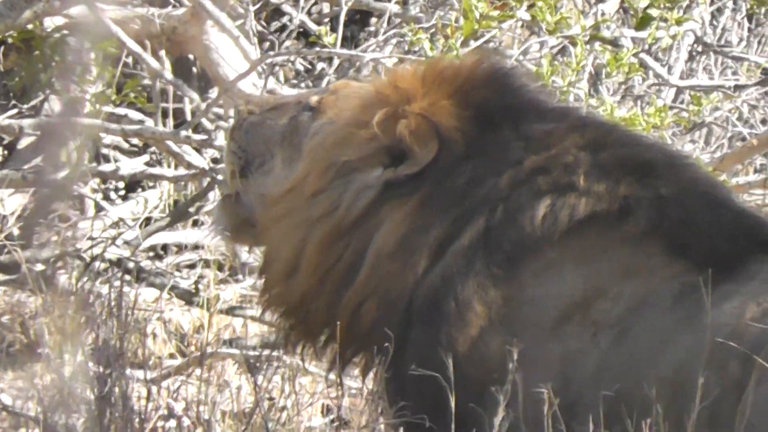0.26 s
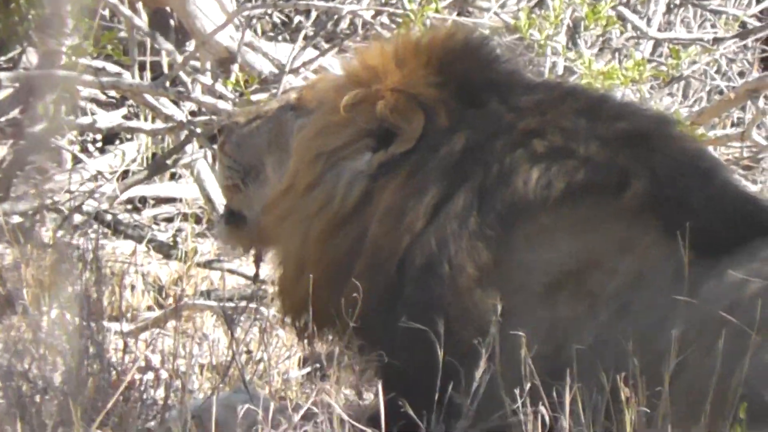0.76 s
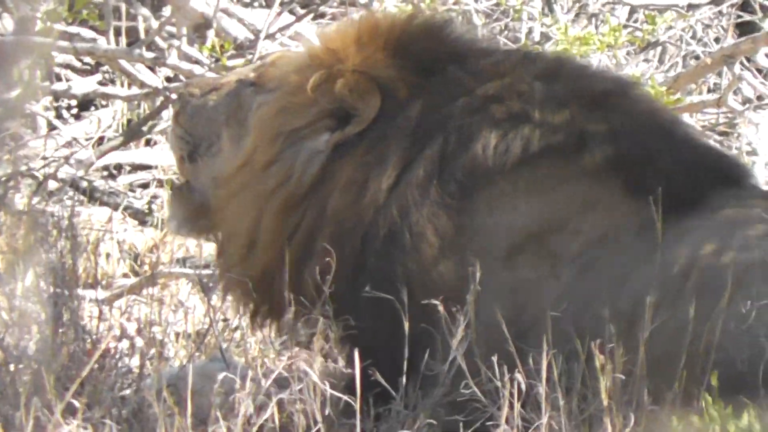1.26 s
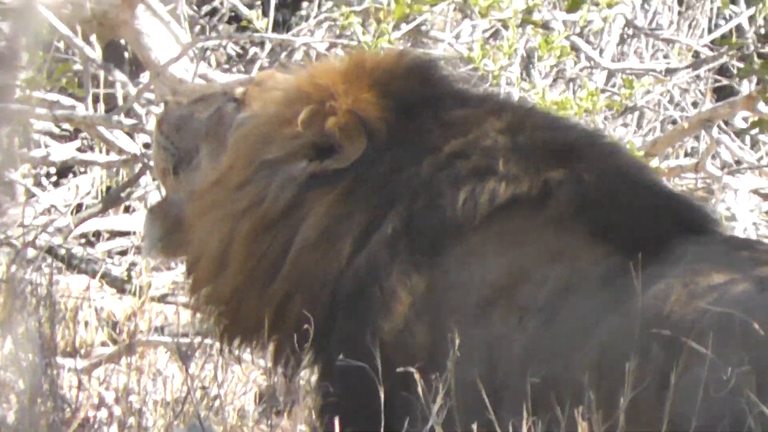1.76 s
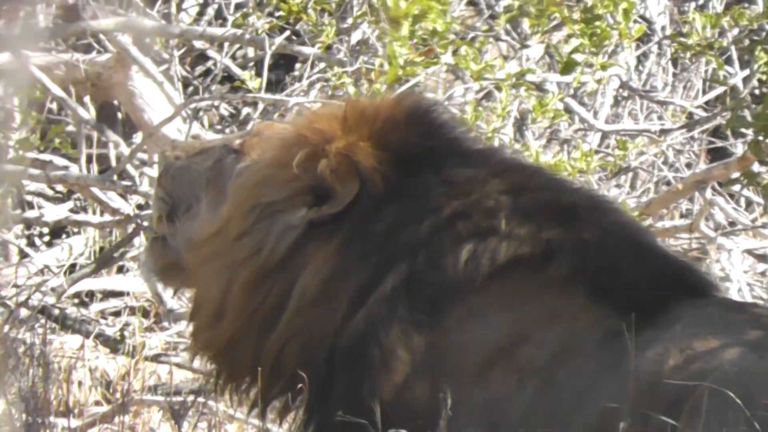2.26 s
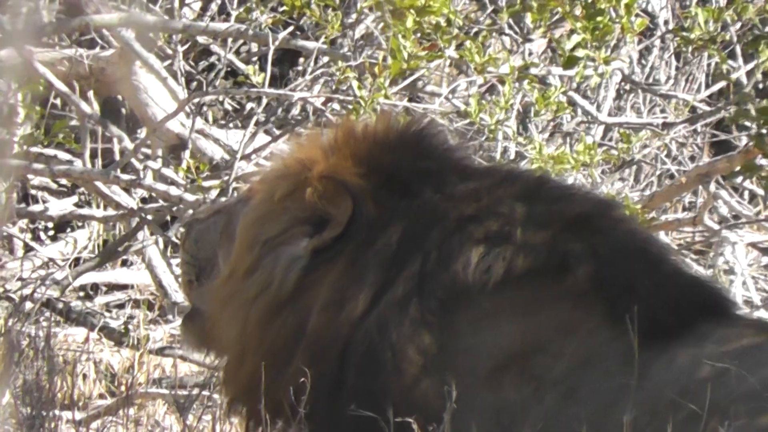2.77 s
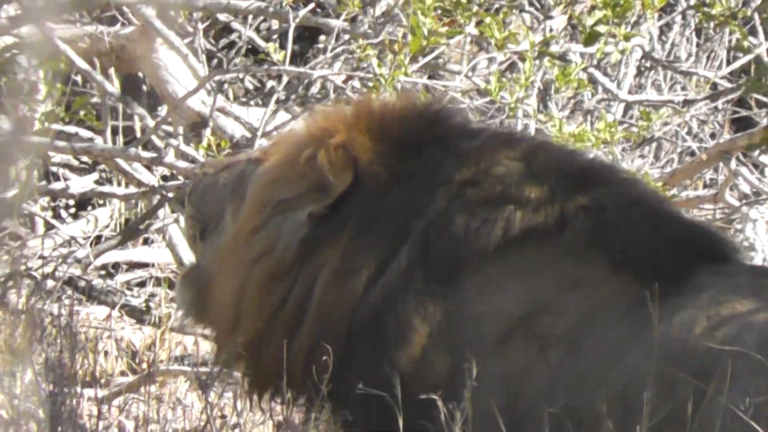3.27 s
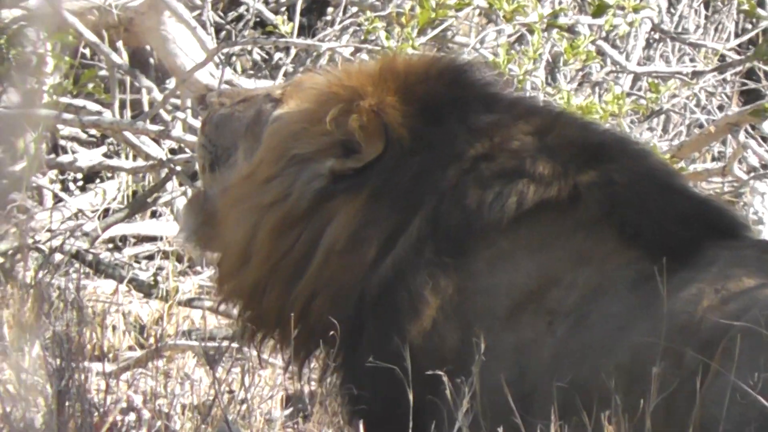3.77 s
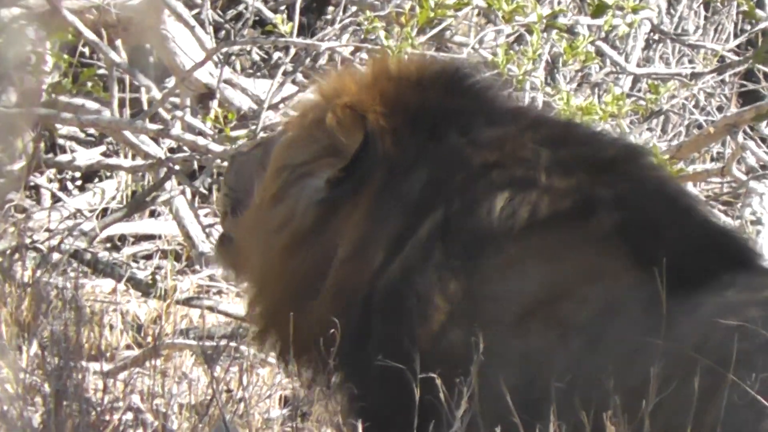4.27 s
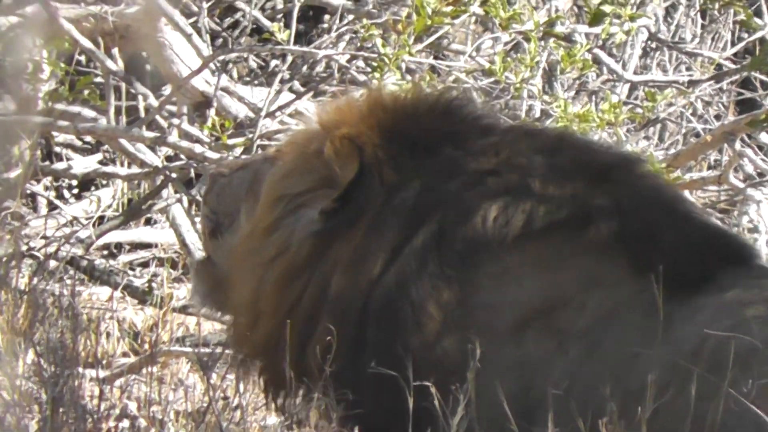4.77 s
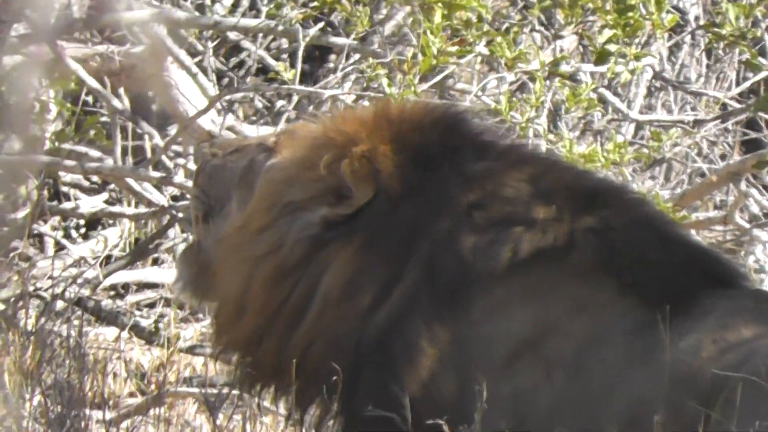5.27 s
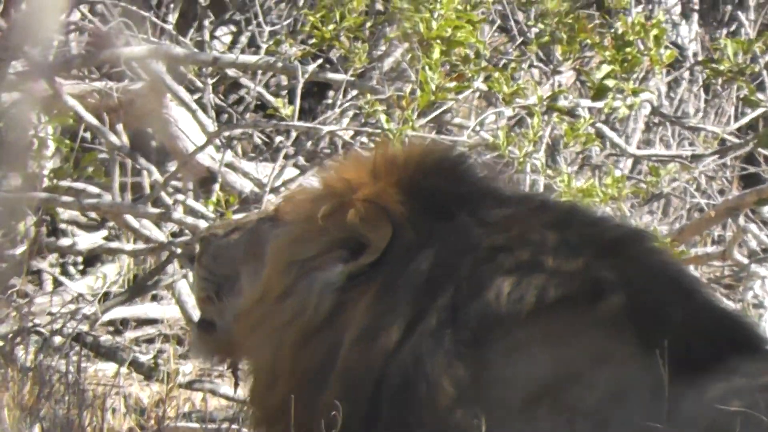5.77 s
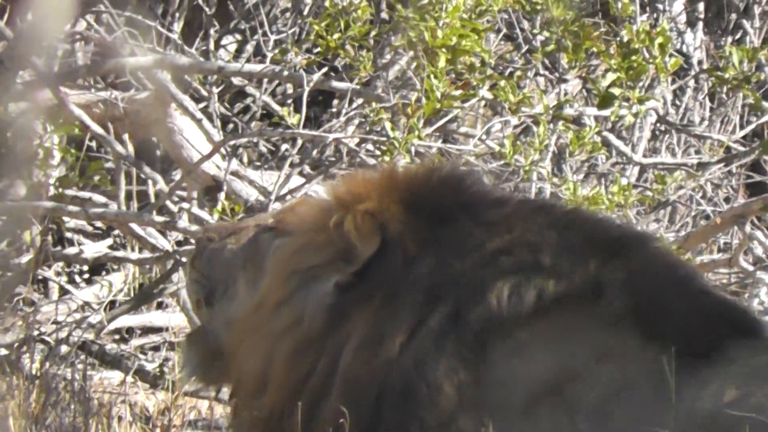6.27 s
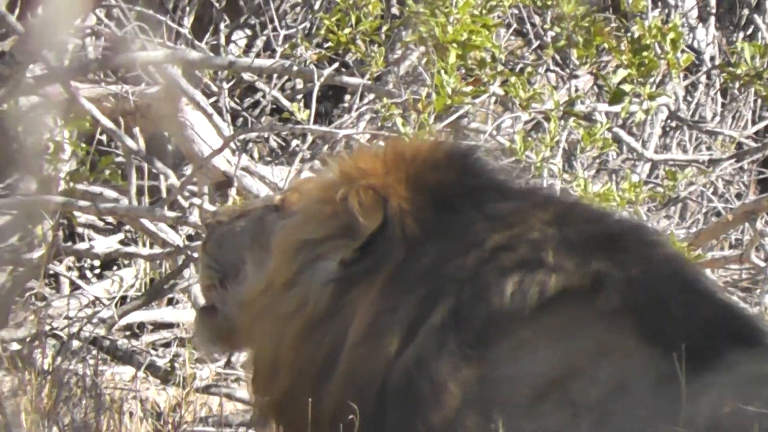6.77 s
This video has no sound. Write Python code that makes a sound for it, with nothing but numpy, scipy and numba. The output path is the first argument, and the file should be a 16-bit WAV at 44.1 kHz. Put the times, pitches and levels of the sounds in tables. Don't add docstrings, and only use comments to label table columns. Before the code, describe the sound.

Outdoors in dry bush, a male lion some way off calls five times, the first already under way. Most calls rise as a hoarse, breathy moan, open into a pure low boom that falls in pitch, then rattle out. Faint thicket echoes follow. Twigs tick early on, and a fly hums near the hand-held stereo microphone during the later calls.

```python
import sys
import numpy as np
from scipy import signal
from scipy.fft import rfft, irfft
from scipy.io import wavfile
from scipy.ndimage import uniform_filter1d
from numba import njit

SR = 44100
rng = np.random.default_rng(int(sys.argv[2]) if len(sys.argv) > 2 else 0)


def put_to_file(sound):
    columns = np.atleast_2d(sound).T
    safe = np.clip(columns, -1, 1)
    whole_steps = np.round(safe * 32767)
    wavfile.write(sys.argv[1], SR, whole_steps.astype(np.int16))


def magnitude_from_level(level_db):
    exponent = np.asarray(level_db, float) / 20
    return 10 ** exponent


N = 310023


def level(x, db):
    return x * magnitude_from_level(db) / np.sqrt(np.mean(x ** 2))


def steady(x, span_s):
    return x / np.sqrt(uniform_filter1d(x ** 2, int(span_s * SR)) + 1e-12)


def walk(rate):
    hold = int(SR / rate)
    steps = np.repeat(rng.standard_normal(N // hold + 1), hold)
    return 1.3 * uniform_filter1d(uniform_filter1d(steps, hold), hold)[:N]


def on_hz(table, hz):
    at, value = np.transpose(table)
    return np.interp(np.log(hz), np.log(at), value)


def columns(calls):
    t = np.arange(N) / SR
    s, *values = np.transpose(np.vstack(calls))
    gate = sum((t >= call[0][0]) & (t <= call[-1][0]) for call in calls)
    return uniform_filter1d(1. * gate, size=900), [np.interp(t, s, v) for v in values]


@njit
def svf(x, hz, width):
    y, b, l = np.empty(len(x)), 0., 0.
    for i in range(len(x)):
        g, k = np.tan(np.pi * hz[i] / SR), width / hz[i]
        v = (b + g * (x[i] - l)) / (1 + g * (g + k))
        b, l, y[i] = 2 * v - b, l + 2 * g * v, k * v
    return y


def ring(x, hz, width):
    hz = hz * np.ones(len(x))
    return svf(svf(x, hz, 1. * width), hz, 1. * width)


def resonate(x, modes, stretch=1):
    out = 0
    for k, (hz, width, db) in enumerate(modes):
        out = out + (-1) ** k * magnitude_from_level(db) * ring(x, hz * stretch, 1.8 * width)
    return out


def place(x, pan, lead):
    hz = np.maximum(np.arange(N // 2 + 1) * SR / N, 1)
    turn = magnitude_from_level(on_hz(pan, hz) / 2) * np.exp(1j * on_hz(lead, hz) / 2)
    return np.array([irfft(rfft(x) * turn, N), irfft(rfft(x) / turn, N)])


# (pitch_hz, level_db per Hz)
BUSH = [(15, -67), (25, -34.5), (43, -16.5), (91, -12.5), (156, 0), (247, -6), (324, -10.5), (435, -10),
        (727, -15.5), (951, -18.5), (1030, -24), (1150, -20.5), (1820, -27), (4930, -34), (15700, -44.5)]
# (pitch_hz, likeness 0-1)
BUSH_ALIKE = [(60, .3), (130, 1), (290, 0.18), (640, .2), (1400, 0.64), (2100, 0.71), (2800, 0.29),
              (4500, 1), (8000, 1), (12000, 0.26)]


def bush():
    out, swell = 0, walk(0.95)
    for hz in 28 * 2 ** np.arange(0, 9.2, 1 / 3):
        alike = np.clip(on_hz(BUSH_ALIKE, hz), 0, .98)
        mid, side = (ring(rng.standard_normal(N), hz, hz / 3) for _ in range(2))
        db = on_hz(BUSH, hz) + 1.0 * swell + 1.0 * walk(8.1)
        left_right = np.sqrt(1 - alike) * side * np.array([[1], [-1]])
        out = out + magnitude_from_level(db) * (np.sqrt(1 + alike) * mid + left_right)
    return level(out, -51.5)


# (pitch_hz, level_db)
CAMERA = [(974, -71), (1260, -76), (2525, -85), (15000, -100)]


def camera():
    t = np.arange(N) / SR
    motor = sum(magnitude_from_level(db + 3.0 + 1.3 * walk(18)) * np.sin(2 * np.pi * hz * t) for hz, db in CAMERA)
    hiss = level(ring(rng.standard_normal(N), 4047, 250), -80)
    drone = level(ring(rng.standard_normal(N), 60, 24), -72.0)
    return motor + hiss + drone


# (start_s, peak_db, pitch_hz)
TWIGS = [(0.573, -48, 6400), (0.7956, -55, 5280), (1.0618, -53.5, 4360), (1.18, -56.5, 4620),
         (1.2794, -52, 4990)]


def twigs():
    out, t = np.zeros(N), np.arange(600) / SR
    for s, db, hz in TWIGS:
        snap = ring(rng.standard_normal(len(t)) * np.exp(-t / 0.0018), hz, 0.77 * hz)
        out[int(s * SR):int(s * SR) + len(t)] += magnitude_from_level(db) * snap / np.abs(snap).max()
    return out


# (time_s, wing_rate_hz, second_partial_db, wing_tick_db)
FLY = [
    [(4.46, 248.3, -78, -88), (4.486, 249.2, -64, -82), (4.516, 288.3, -61, -82), (4.6, 260.1, -59, -80),
     (4.658, 280.0, -51, -78), (4.702, 249.0, -56.5, -78.5), (4.9, 262.6, -54, -69),
     (5.038, 252.9, -60, -70), (5.08, 235.4, -67.5, -77)],
    [(5.69, 252.9, -63, -77), (5.726, 279.2, -55.5, -74), (5.918, 257.0, -50.5, -73.5),
     (5.98, 278.5, -56, -74), (6.074, 249.3, -54, -73.5), (6.156, 257.4, -47, -70),
     (6.364, 242.3, -40, -70), (6.41, 249.5, -48, -71), (6.44, 227, -73, -90)],
]
# (level_db, follow_db per dB of nearness)
FLY_LAYERS = [(-56, 0.48), (-55, 0.56)]
# (multiple of wing rate, level_db)
BUZZ = [(3, 0), (4, -1), (5, -6), (6, -12), (7, -18), (8, -24)]
# (pitch_hz, lead_rad)
FLY_PAN = [(200, 6.5), (700, 4.5), (1500, -2.5)]
FLY_LEAD = [(250, -1), (500, -2), (1500, -2.5)]


def fly():
    gate, (hz, second_db, tick_db) = columns(FLY)
    second_db = second_db + 1.5 * walk(16)
    first_db, buzz_db = (db + follow * (second_db + 50.5) for db, follow in FLY_LAYERS)
    brush = walk(45)
    jumps = np.repeat(rng.standard_normal(N // 1400 + 1), 1400)[:N]
    turns = np.cumsum(hz * (1 + 0.019 * jumps + 0.028 * walk(110))) / SR
    hum = magnitude_from_level(first_db + 4 * walk(40)) * np.sin(2 * np.pi * turns)
    hum = hum + magnitude_from_level(second_db + 2.5 * walk(45)) * np.sin(2 * 2 * np.pi * turns)
    for k, db in BUZZ:
        partial_db = buzz_db + db - 5 + 2.5 * brush + 2.5 * walk(40)
        hum = hum + magnitude_from_level(partial_db) * np.sin(2 * np.pi * k * turns)
    cycle = turns.astype(int)
    stroke_db = 3.0 * rng.standard_normal(N // 100)[cycle] + 1.3 * brush
    stroke = np.diff(cycle, prepend=0) * magnitude_from_level(stroke_db)
    tick = level(ring(stroke, 6200 * (1 + 0.093 * walk(90)), 3800), 0)
    return place(gate * magnitude_from_level(5.5) * hum, FLY_PAN, FLY_LEAD) + gate * magnitude_from_level(tick_db + 2.0) * tick


@njit
def thicket(x, lags, gain, damp):
    line, soft, out = np.zeros((8, 8192)), np.zeros(8), np.zeros((2, len(x)))
    for i in range(len(x)):
        total = 0.
        for k in range(8):
            soft[k] += (1 - damp) * (gain[k] * line[k, (i - lags[k]) & 8191] - soft[k])
            total += soft[k]
            out[k % 2, i] += soft[k]
        for k in range(8):
            line[k, i & 8191] = x[i] + soft[k] - total / 4
    return out


def echoes(roar):
    lags = rng.integers(900, 5000, size=8)
    echo = thicket(roar + 1e-18, lags, magnitude_from_level(-60 * lags / SR / 1.33), .65)
    return magnitude_from_level(-32.5) * echo


# (start_s, peak_db, pitch_hz, ring_s)
SQUEAK = [(4.1814, -44, 4280, 0.05)]


def squeak():
    s, db, hz, ring_s = SQUEAK[0]
    t = np.maximum(np.arange(N) / SR - s, 0)
    return magnitude_from_level(db) * (1 - np.exp(-t / 0.0011)) * 1000 ** (-t / ring_s) * np.sin(2 * np.pi * hz * t)


# (time_s, pitch_hz, roughness 0-1)
FOLDS = [
    [(0, 223, .4), (.06, 217.5, .37), (.13, 180.7, .1), (.2, 170, .05), (.3, 156.8, .06), (.4, 152, .08),
     (.44, 151, .8)],
    [(1.55, 159, .35), (1.65, 210, .2), (1.72, 234, .12), (1.82, 241, .2), (1.99, 222, .5),
     (2.035, 190, .1), (2.22, 161.7, .06), (2.34, 150.5, .06), (2.39, 153, .8)],
    [(3.4, 158, .3), (3.47, 163, .2), (3.54, 205, .35), (3.6, 197, .55), (3.66, 215, .5), (3.77, 188, .38),
     (3.86, 176.5, .05), (4.08, 149.5, .08), (4.14, 152, .8)],
    [(5.06, 172, .35), (5.13, 159, .15), (5.19, 164, .4), (5.28, 159.4, .22), (5.38, 164.8, .08),
     (5.46, 158.5, .09), (5.56, 148, .1), (5.61, 152, .8)],
    [(6.46, 152, .35), (6.53, 150, .14), (6.6, 157.3, .1), (6.68, 150, .1), (6.74, 146, .15),
     (6.8, 146, .7), (6.88, 138, .9)],
]
# (start_s, boom_opens_s, boom_closes_s, end_s)
STAGES = [(-.4, .11, 0.42, .62), (1.5, 2.05, 2.33, 2.6), (3.348, 3.84, 4.14, 4.36),
          (5.019, 5.33, 5.58, 5.78), (6.432, 6.56, 6.7, 7.02)]


def fold_beat():
    _, (hz, rough) = columns(FOLDS)
    since = np.arange(N) / SR - np.array(STAGES)[:, :1]
    scoop = np.sum((since > 0) * np.exp(-(since / .05) ** 2 / 2), axis=0)
    hz = hz * (1 - .14 * scoop)
    turns = np.cumsum(hz * (1 + .15 * rough ** 2 * walk(60))) / SR
    return hz, rough, turns


# (time_s, level_db)
ROARS = [
    [(0.0, -27), (0.064, -28.5), (0.15, -14.5), (0.22, -12.5), (0.39, -16), (0.424, -27), (0.62, -55)],
    [(1.5, -59), (1.542, -35.5), (1.576, -26.5), (1.998, -29), (2.078, -16.5), (2.18, -11), (2.342, -16.5),
     (2.378, -28.5), (2.6, -52.5)],
    [(3.36, -48.5), (3.426, -28), (3.56, -26), (3.576, -32.5), (3.774, -27), (3.896, -11), (4.07, -15),
     (4.23, -47.5), (4.36, -51.5)],
    [(5.02, -44.5), (5.106, -22), (5.158, -24), (5.178, -33), (5.276, -26.5), (5.404, -12.5), (5.558, -18),
     (5.592, -28.5), (5.78, -48.5)],
    [(6.44, -49), (6.508, -24), (6.606, -14.5), (6.698, -16.5), (6.806, -26), (6.83, -34), (6.906, -43),
     (6.926, -54), (7.02, -56)],
]
# (time_s, depth_db)
CATCHES = [(1.614, -5.5), (1.701, -3), (1.945, -5.5), (3.5, -7), (3.6, -9.5), (3.745, -2.5), (5.075, -6.5),
           (6.76, -8.5)]


def fold_boom(hz, rough, turns):
    gate, (boom_db,) = columns(ROARS)
    t = np.arange(N) / SR
    boom_db = boom_db + sum(db * np.exp(-((t - s) / 0.011) ** 2 / 2) for s, db in CATCHES)
    swing = np.sqrt(2) * np.sin(2 * np.pi * turns) * magnitude_from_level((.45 + 4.5 * rough) * walk(40))
    flap = steady(ring(rng.standard_normal(N) * magnitude_from_level(3.0 * walk(45)), hz, 70), .05)
    slack = np.clip(1.25 * rough, 0, 1) ** 3
    return gate, magnitude_from_level(boom_db) * (np.sqrt(1 - slack) * swing + np.sqrt(slack) * flap)


def slaps_and_puffs(rough, turns):
    cycle = turns.astype(int)
    slap = np.diff(cycle, prepend=0) * magnitude_from_level(rough * 14.0 * rng.standard_normal(N // 100)[cycle])
    puff = np.exp(-(turns % 1) / .5) * magnitude_from_level(1.6 * walk(35))
    rasp = level(puff * rng.standard_normal(N), -13.0)
    return slap, puff, rasp


# (time_s, effort_db)
EFFORT = [
    [(0.0, -34), (0.102, -36), (0.114, -32), (0.236, -43), (0.342, -36.5), (0.566, -56.5), (0.608, -75),
     (0.62, -58)],
    [(1.5, -65), (1.6, -40), (1.686, -36), (1.75, -40), (2.084, -31.5), (2.21, -43.5), (2.31, -38.5),
     (2.6, -60.5)],
    [(3.36, -62.5), (3.398, -44), (3.49, -35.5), (3.556, -38.5), (3.86, -34), (3.946, -45), (4.044, -35.5),
     (4.36, -63)],
    [(5.02, -60), (5.07, -40), (5.29, -38.5), (5.384, -36), (5.426, -47), (5.504, -36), (5.632, -48.5),
     (5.78, -54.5)],
    [(6.44, -69), (6.49, -36.5), (6.592, -36.5), (6.608, -46.5), (6.718, -36.5), (6.864, -48.5),
     (6.872, -44), (7.02, -68)],
]
# (upper_resonance_db, breath_db, extra_moan_breath_db, teeth_db)
STRENGTH = [(0, -58.5, -2, -64), (0, -56.5, -7, -64.5), (1, -56.5, -2.5, -65), (-0.5, -57, 2, -60.5),
            (0.5, -57.5, 3.5, -70)]
# (stage, lower_resonance_db, upper_resonance_db, breath_db)
OPENING = [(0, 0.5, -22, -23.5), (1, -2.5, -8, -14), (1.5, -0.5, -5, -10.5), (2, -2.5, -5, -4.5),
           (2.4, -5.5, -2, -2), (3, 0, -6, 1.5), (3.5, -3, -6, -4.5), (4, -5, -12, -22)]
# (stage, lower_hz, upper_hz, whistling_breath_hz)
JAWS = [(0, 379, 599, 3730), (1, 391.6, 633, 3460), (1.5, 419.2, 652, 3250), (2, 417.3, 692, 3350),
        (2.4, 385, 669.3, 3690), (3.002, 375, 678, 3470), (4.002, 401, 703, 3450)]


def throat_shape():
    attack_s, waver_per_s = .07, 14
    marks = [(a, a + attack_s, max(b, a + 1.5 * attack_s), c, d) for a, b, c, d in STAGES]
    t = np.arange(N) / SR
    stage = np.interp(t, np.ravel(marks), np.tile(np.arange(len(marks[0])), len(marks)))
    which = np.searchsorted(np.array(STAGES)[1:, 0], t)
    upper_db, breath_db, moan_db, teeth_db = np.transpose(STRENGTH)[:, which]
    breath_db = breath_db + moan_db * np.clip(2 * (2 - stage), 0, 1)
    _, (effort_db,) = columns(EFFORT)
    at, *db = np.transpose(OPENING)
    low, high, air = (np.interp(stage, at, v) + 2.04 * walk(waver_per_s) * share
                      for v, share in zip(db, (1, 1, .5)))
    at, *hz = np.transpose(JAWS)
    hz = [np.interp(stage, at, v) * (1 + .02 * walk(waver_per_s)) for v in hz]
    teeth_db = teeth_db + 0.68 * air + 0.28 * (effort_db + 37)
    nose_db = effort_db - 33.5 - 9 * np.clip(stage - 2, 0, 1)
    return hz, effort_db + low, effort_db + upper_db + high, breath_db + air, teeth_db, nose_db


# (multiple of pitch, level_db over lower resonance)
OVERTONES = [(2, -3.5), (3, -15), (4, -9.5)]


def overtones(hz, rough, turns, low_hz, low_db, high_hz, high_db):
    def line(k):
        return np.sin(2 * np.pi * k * turns + k)

    lines = sum(magnitude_from_level(db) * line(k) for k, db in OVERTONES) * np.clip(1 - 2.1 * rough, 0, 1)
    sing = 0
    for db, at in ((low_db, low_hz), (high_db, high_hz)):
        for k in range(2, 6):
            sing = sing + magnitude_from_level(4 + db) * line(k) / (1 + ((k * hz - at) / 36.3) ** 2)
    return magnitude_from_level(uniform_filter1d(low_db, size=5000)) * lines + sing * np.clip(1 - 1.6 * rough, 0, 1)


# (pitch_hz, width_hz, level_db)
MOUTH = [(787, 450, -17.5), (983, 50, 6), (1110, 61, -1.5), (1354, 56, -4), (1680, 160, -13.5),
         (2046, 22, -11), (3100, 71, -17)]


def throat(slap, rasp, drive, low_hz, low_db, high_hz, high_db, breath_db):
    low = steady(ring(drive, low_hz, 36) + 0.41 * ring(drive, 0.726 * low_hz, 130), 0.024)
    high = steady(ring(drive, high_hz, 51) - 0.17 * ring(drive, high_hz, 260), 0.039)
    mouth = steady(resonate(slap + 1.3 * rasp, MOUTH, (high_hz / 665) ** 0.99), 1.0)
    mouth = mouth * magnitude_from_level(.5 * high_db + .5 * breath_db - 1.5)
    return 1.03 * magnitude_from_level(low_db) * low - magnitude_from_level(high_db - 0.7) * high + mouth


def teeth_and_nose(drive, hz, teeth_db, nose_db):
    teeth_hz = 2024 * (hz / 160) ** 0.2 * (1 + .025 * walk(9))
    teeth = magnitude_from_level(teeth_db + 3.5 * walk(14)) * steady(ring(drive, teeth_hz, 150), .06)
    nose_hz = 3100 * (1 + 0.038 * walk(7))
    nose = magnitude_from_level(nose_db + 2.2 * walk(18)) * steady(ring(drive, nose_hz, 260), .06)
    return teeth + nose


# (pitch_hz, width_hz, level_db)
BREATH = [(3000, 820, 4.5), (4540, 1100, 4), (5660, 2500, -3), (8500, 5900, -16.5)]


def breath(puff, whistle_hz):
    air = (1.4 + puff) * rng.standard_normal(N)
    whistle = 0.79 * magnitude_from_level(4 * walk(11)) * ring(air, whistle_hz, 220)
    whistle = whistle + .9 * magnitude_from_level(4 * walk(9)) * ring(air, 1.22 * whistle_hz, 300)
    return level(resonate(air, BREATH) + whistle, 0)


def lion():
    hz, rough, turns = fold_beat()
    gate, boom = fold_boom(hz, rough, turns)
    slap, puff, rasp = slaps_and_puffs(rough, turns)
    drive = slap + rasp * (0.25 + 1.1 * rough)
    (low_hz, high_hz, whistle_hz), low_db, high_db, breath_db, teeth_db, nose_db = throat_shape()
    voice = boom + throat(slap, rasp, drive, low_hz, low_db, high_hz, high_db, breath_db)
    voice = voice + overtones(hz, rough, turns, low_hz, low_db, high_hz, high_db)
    voice = voice + teeth_and_nose(drive, hz, teeth_db, nose_db)
    voice = gate * (voice + magnitude_from_level(breath_db - 0.8) * breath(puff, whistle_hz))
    low_cut = signal.butter(6, 105, "high", fs=SR, output="sos")
    return signal.sosfilt(low_cut, voice) + squeak()


# (pitch_hz, lead_rad)
LION_PAN = [(60, -6), (110, -1), (200, -0.5), (380, -4), (700, -5), (1290, -1), (2380, -0.5), (4400, -1),
            (8120, 3.5), (15000, 0.5)]
LION_LEAD = [(100, -0.27), (430, -0.43), (1030, 0.91), (2300, 0.21), (3600, 0.74), (6000, -0.089)]


def scene():
    roar = lion()
    around = bush() + camera() + twigs() + fly()
    return around + echoes(roar) + place(roar, LION_PAN, LION_LEAD)


def top_cut(x):
    return signal.sosfilt(signal.butter(12, 16070, fs=SR, output="sos"), x)


def record(dry):
    return top_cut(dry)


dry = scene()
out = record(dry)
put_to_file(out)
```